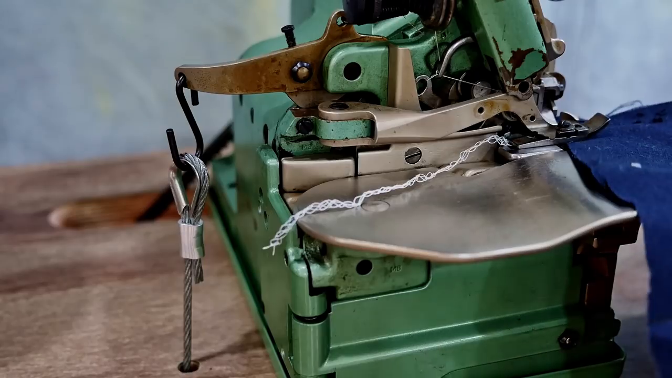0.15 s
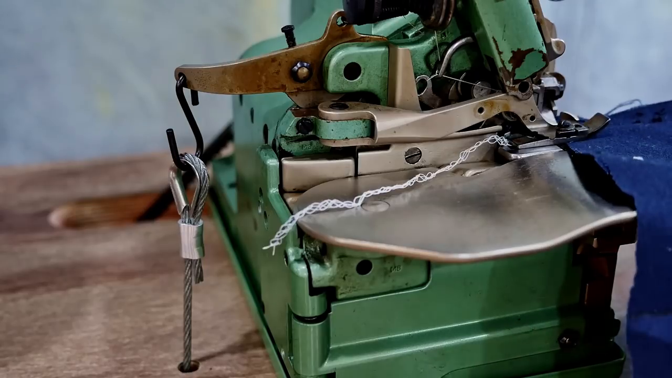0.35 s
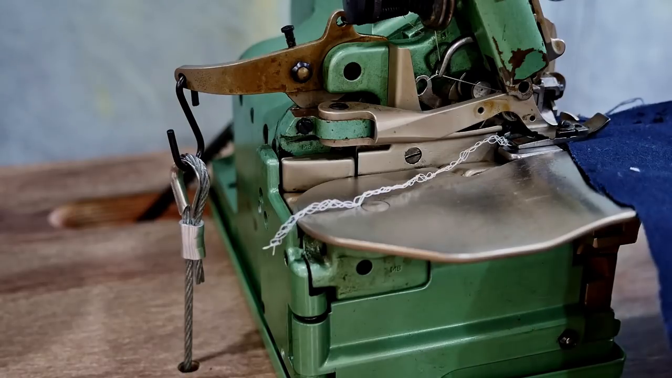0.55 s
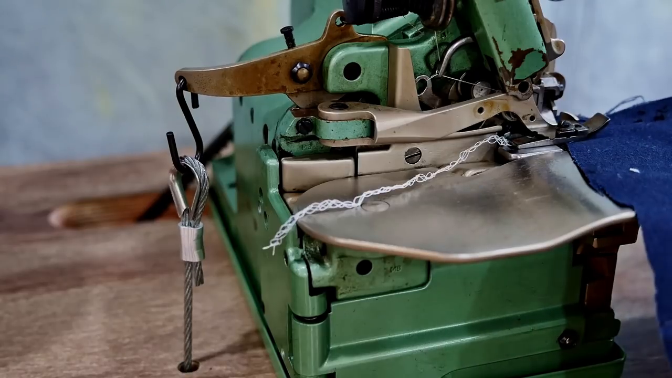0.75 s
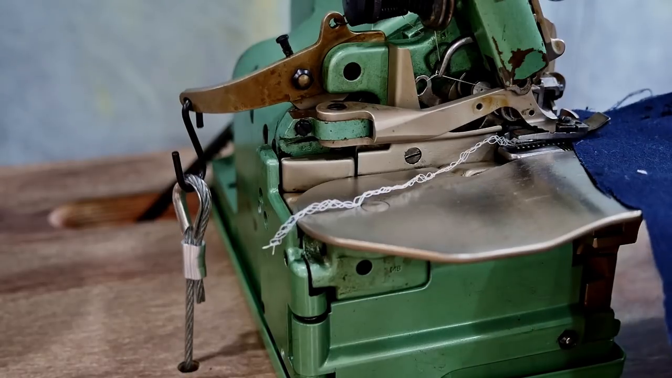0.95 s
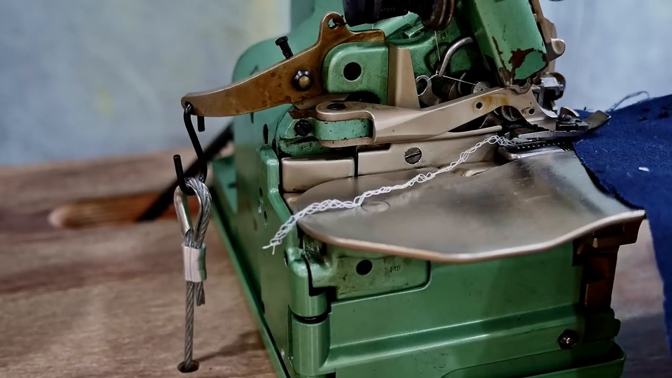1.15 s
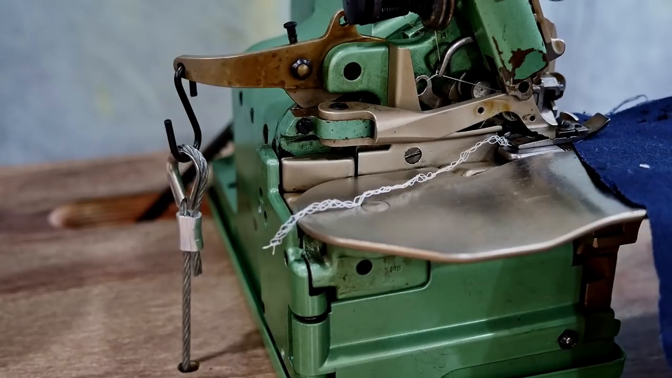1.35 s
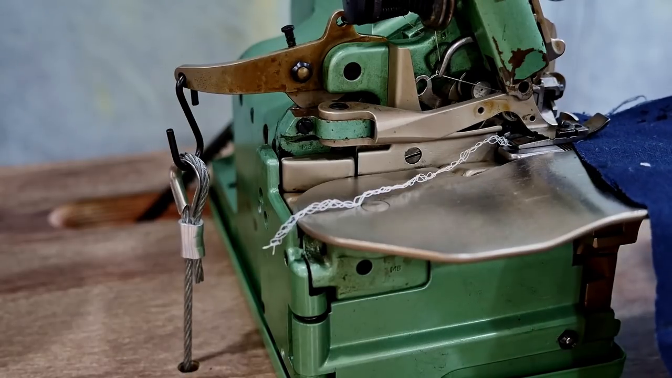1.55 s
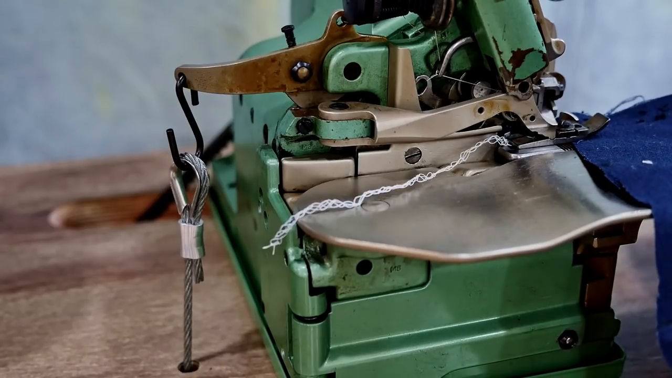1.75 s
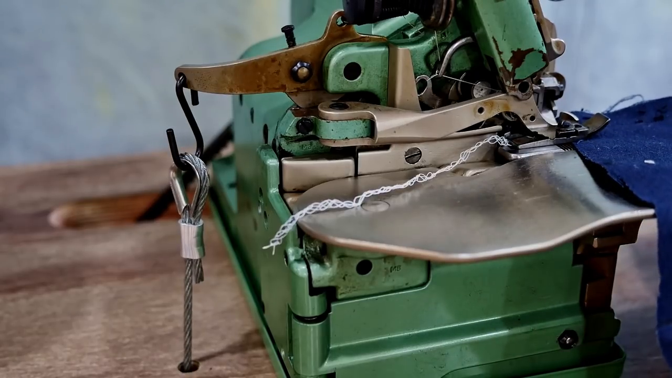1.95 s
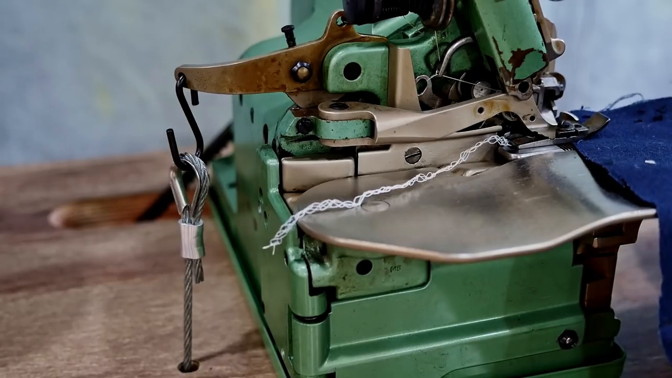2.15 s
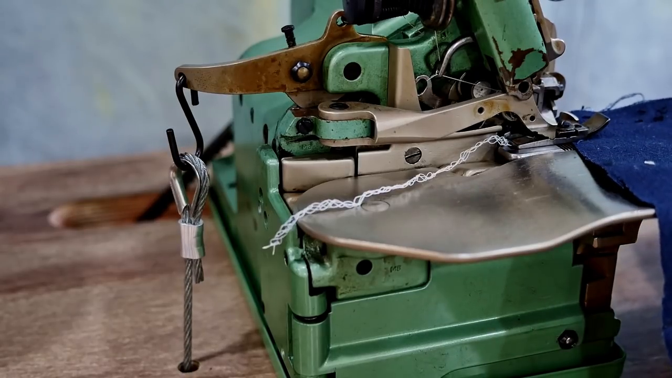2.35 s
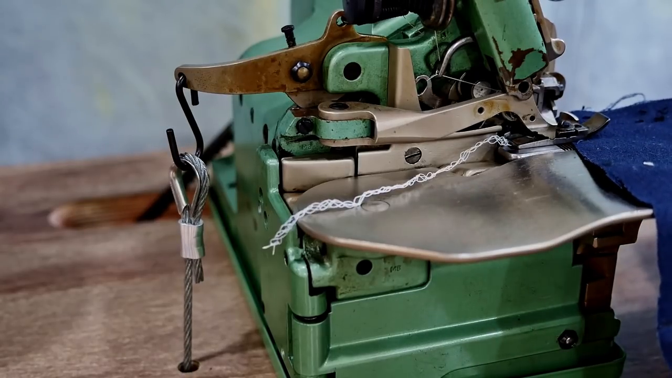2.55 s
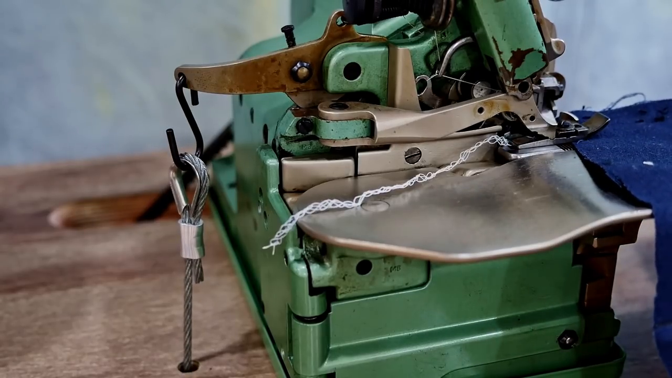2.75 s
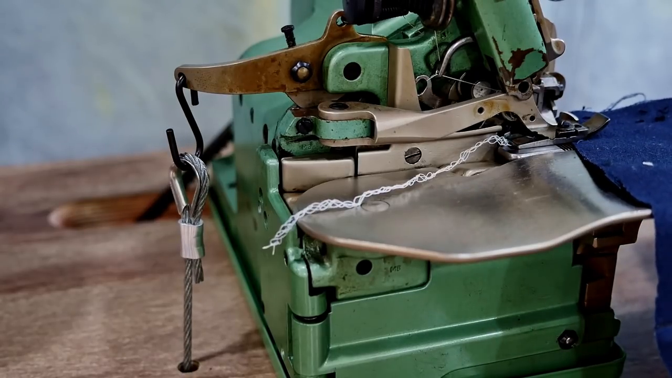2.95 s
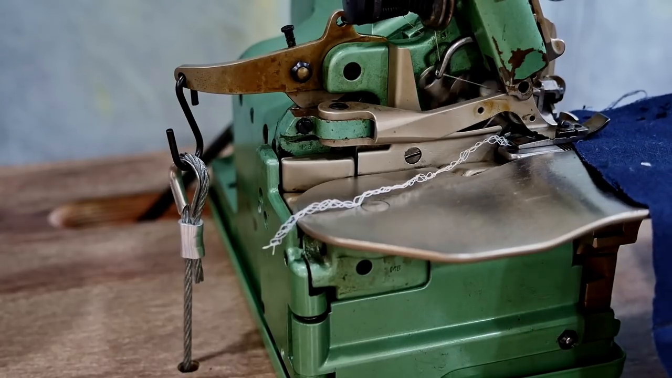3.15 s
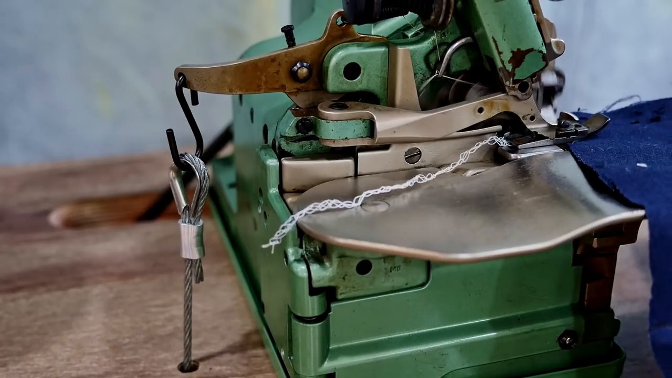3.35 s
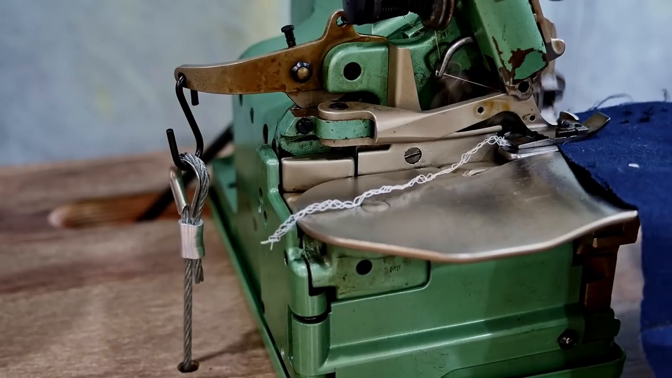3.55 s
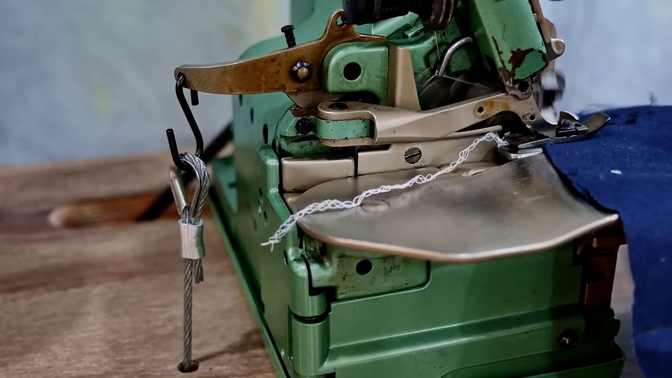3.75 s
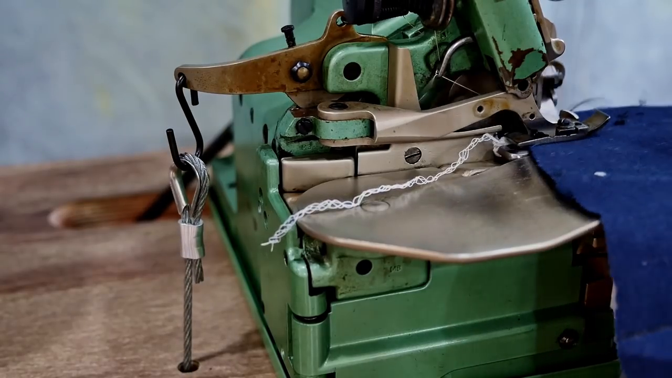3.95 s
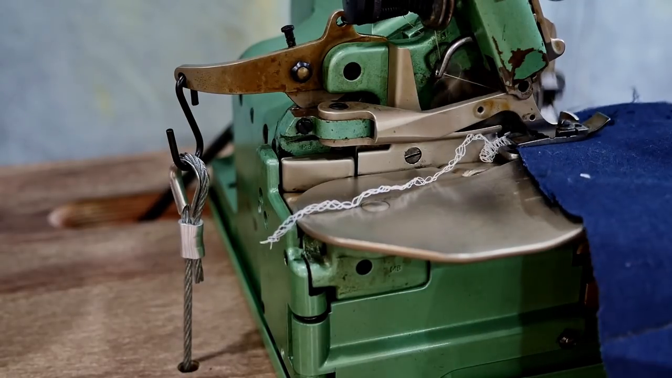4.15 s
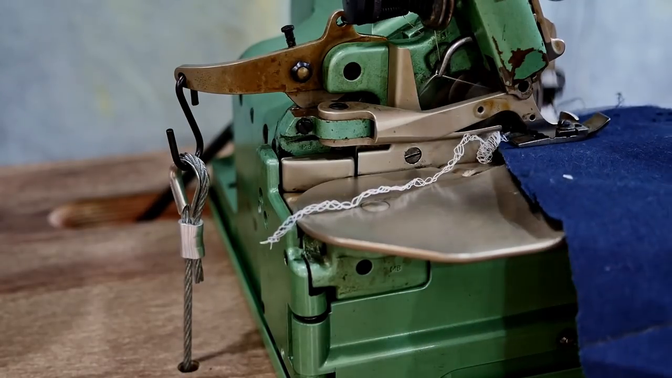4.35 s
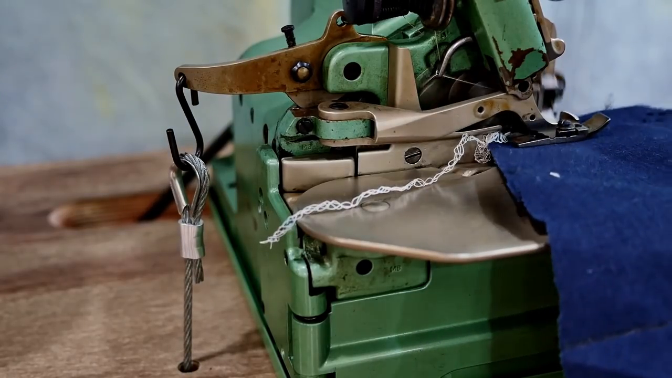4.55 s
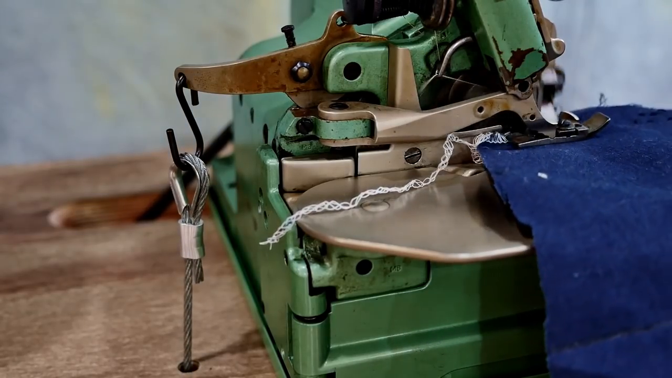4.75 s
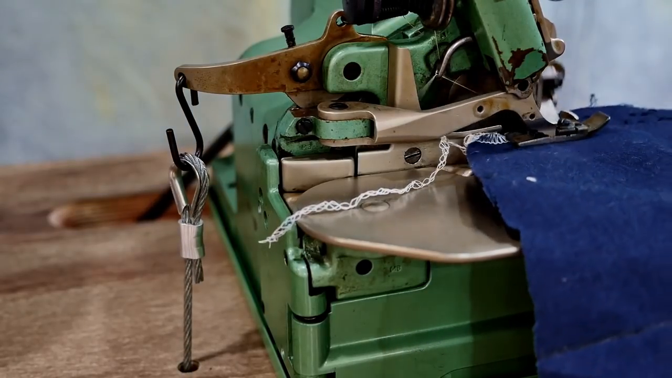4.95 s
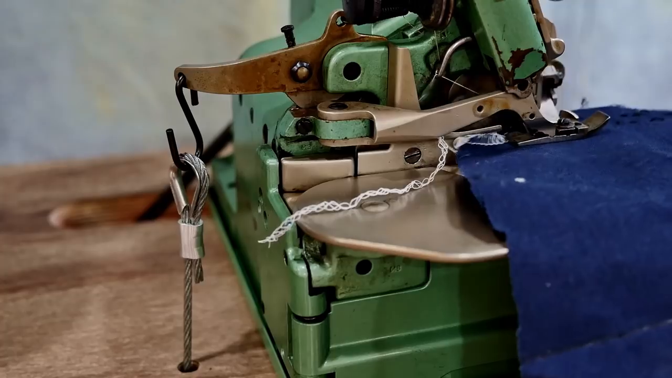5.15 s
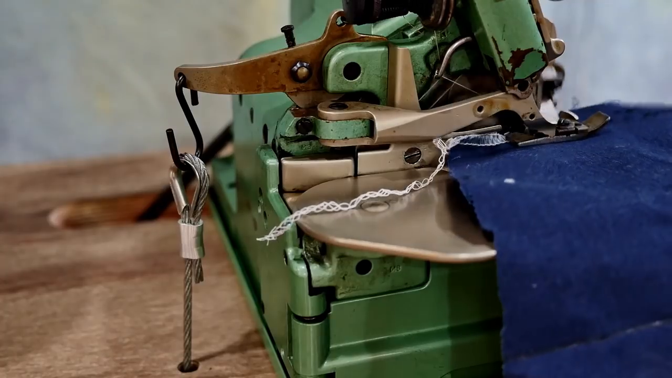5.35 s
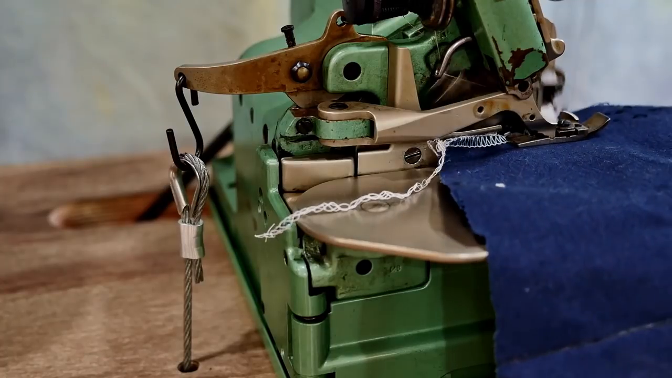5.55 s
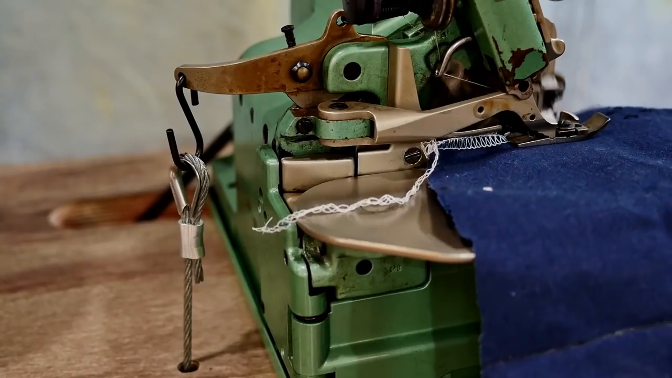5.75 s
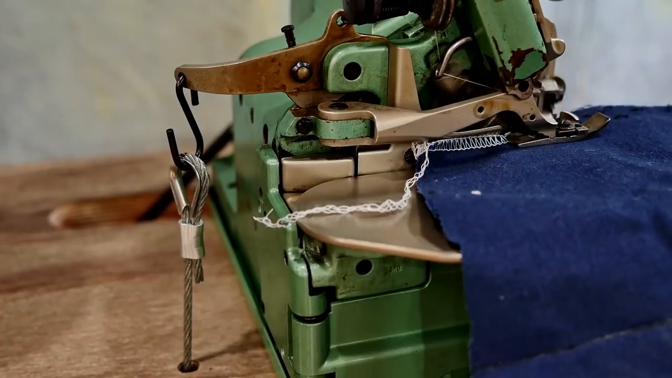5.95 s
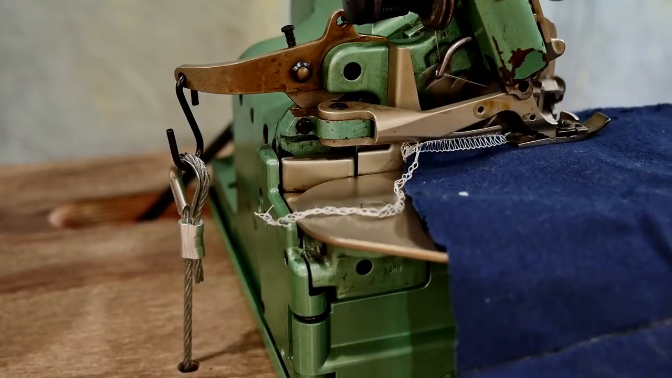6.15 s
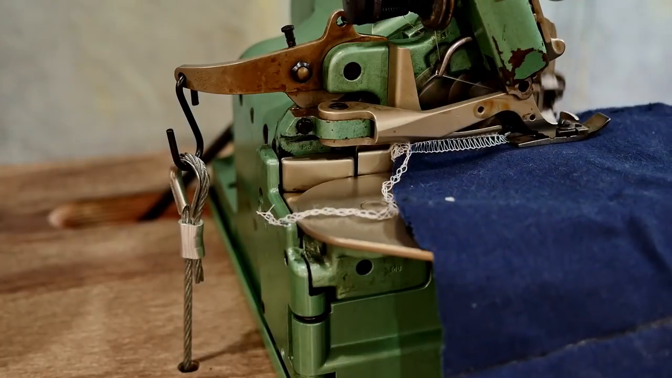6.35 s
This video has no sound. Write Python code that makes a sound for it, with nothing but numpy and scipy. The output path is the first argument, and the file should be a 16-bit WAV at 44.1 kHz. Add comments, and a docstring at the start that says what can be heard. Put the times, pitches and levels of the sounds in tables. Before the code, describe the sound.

A quiet workshop, heard through a close stereo microphone with little bass. From 0 s a faint low motor hum and soft airy noise continue under light brushing of cloth. Small dull knocks on a wooden table come around 0.6-0.7 s, then a cluster at 1.05-1.35 s with a sharp dry crack at 1.3 s. A lull follows, broken by a single harder, ringing table thump at 2.2 s and a barely audible rustle at 2.9 s. At 3.16 s the clutch snaps; the machine spins up within about 0.4 s into loud, dense metallic chatter, roughly thirteen strokes a second, with ringing steel blows, crisp ticks, grinding rattle, a fuzzy midrange drone and bright fizz. From 4.3 to 4.6 s it slows to about nine and a half strokes a second, slightly softer, and holds steadily, with occasional louder ticks, until it cuts off running at 6.4 s.

```python
"""Overlock sewing machine in a workshop.

The motor idles with a hum of shaft orders while hands brush cloth (swelling noise) and knock the wooden table
(ringing modes). The clutch snaps, the machine runs up fast, then settles to a slower stitch.
A shaft angle paces it: each turn under load gives one ringing blow of steel partials, every turn gives small
noise-burst ticks, and bands of noise (rattle, grind, drone, fizz) swell with the angle.
"""
import sys
import numpy as np
from scipy import signal
from scipy.fft import rfft, irfft, next_fast_len
from scipy.io import wavfile
from scipy.ndimage import uniform_filter1d, map_coordinates

SR = 44100
rng = np.random.default_rng(int(sys.argv[2]) if len(sys.argv) > 2 else 0)


def convert_level_to_amplitude(level_db):
    """Map a level in decibels to its linear amplitude factor."""
    exponent = np.asarray(level_db, float) / 20
    return 10 ** exponent


def dump(signal):
    """Clip the signal to [-1, 1] and save it as 16-bit WAV at the path in sys.argv[1]."""
    limited = np.clip(np.atleast_2d(signal).T, -1, 1)
    pcm = np.round(limited * 32767).astype(np.int16)
    wavfile.write(sys.argv[1], SR, pcm)


N = 283122

CLUTCH_S, START_ANGLE_TURNS = 3.159, 0.2983  # the clutch engages with the shaft this far into a turn
FULL_SPEED_TURNS_PER_S = 13.4
# Speed of the shaft. Each row: time in seconds, speed in turns per s.
SPEED = [(3.3205, 5.4564), (3.5487, 13.4686), (4.3073, 13.3316), (4.5818, 9.4164), (6.42, 9.4819)]
# Left-right likeness of wide noise. Each row: frequency in Hz, correlation from 0 to 1.
LIKENESS = [(40, 0.11), (150, 0.81), (500, 0.71), (2000, 0.86), (6000, 0.83), (12000, 0.57)]


def unit(x):
    """Scaled to rms 1."""
    return x / np.sqrt(np.mean(x ** 2) + 1e-20)


def along(points, hz):
    """(Hz, value) points read on a log frequency axis."""
    f, v = np.transpose(points)
    return np.interp(np.log(hz + 1), np.log(f + 1), v)


def wobble(rate_hz):
    """A smooth random curve, rate_hz knots a second."""
    knots = rng.standard_normal(int(N * rate_hz / SR) + 4)
    return map_coordinates(knots, [np.arange(N) * rate_hz / SR])


def filtered(x, response):
    """x times a complex response of frequency."""
    m = next_fast_len(N + SR // 2)
    return irfft(rfft(x, m) * response(np.fft.rfftfreq(m, 1 / SR)), m)[..., :N]


def resonances(peaks, f):
    """Causal sum of (Hz, width in Hz, dB) resonances of alternating sign."""
    return sum((-1) ** k * convert_level_to_amplitude(db) * 1j * f * w / (c * c - f * f + 1j * f * w)
               for k, (c, w, db) in enumerate(peaks))


def stereo_noise(spectrum, likeness, spiky_db, patchy_db):
    """Stereo noise of rms 1, in grains of unequal size and patches some 700 Hz by 12 ms."""
    grains = rng.standard_normal((2, N)) * convert_level_to_amplitude(spiky_db * unit(wobble(600)))
    z = signal.stft(grains, nperseg=256)[2]
    patches = uniform_filter1d(rng.standard_normal(z.shape[1:]), size=4, axis=0)
    patches = uniform_filter1d(patches, size=4, axis=1)
    noise = signal.istft(z * convert_level_to_amplitude(patchy_db * unit(patches)), nperseg=256)[1][:, :N]

    def mid_side(hz):
        turn = np.arccos(np.clip(along(likeness, hz), -1, 1)) / 2
        return spectrum(hz) * [np.cos(turn), np.sin(turn)]

    mid, side = filtered(noise, mid_side)
    return unit(np.array([mid + side, mid - side]))


def add(track, s, sound):
    """Mixes a sound in at s seconds."""
    start = round(s * SR)
    track[start:start + len(sound)] += sound[:N - start]


def shaft():
    """Angle in turns, speed in turns per s and in dB re full speed, effort (grip of the clutch) in dB."""
    # Each row: time in seconds, effort in dB.
    effort = [(3.159, -41), (3.21, -15.5), (3.37, -11), (3.42, -4.5), (3.471, 3), (3.56, 1), (3.8, -0.5),
              (4.1, 0.5), (6.42, 0.5)]
    t = np.arange(N) / SR
    speed = np.interp(t, *np.transpose(SPEED)) * (t >= CLUTCH_S)
    angle = START_ANGLE_TURNS + np.cumsum(speed) / SR
    speed_db = 20 * np.log10(speed / FULL_SPEED_TURNS_PER_S + 1e-3)
    effort_db = np.interp(t, *np.transpose(effort), left=-120, right=-120)
    return angle, speed, speed_db, effort_db


def each_turn(share):
    """Samples at which the shaft passes this share of a turn."""
    angle = shaft()[0]
    passes = np.arange(int(angle[-1]) + 1) + share
    return np.searchsorted(angle, passes[(passes > START_ANGLE_TURNS) & (passes < angle[-1])])


def moan():
    """A fuzzy tone of rms 1: a carrier of random strength and phase, rising with speed lost to cloth drag."""
    lost = (FULL_SPEED_TURNS_PER_S - shaft()[1]) * (np.arange(N) / SR > SPEED[1][0])
    hz = 795 + 12 * lost
    phase = 2 * np.pi * np.cumsum(hz) / SR
    return unit(wobble(70) * np.cos(phase) + wobble(70) * np.sin(phase))


def running():
    """Rattle and grind of the mechanism, drone of the table, fizz of thread and knife: noise loaded by angle."""
    # Rows: rattle, grind, drone, fizz. Each row: relative level at full speed in dB, dB per dB of effort,
    # dB per dB of speed, rise time constant after the clutch in seconds.
    layers = [(-34.5, 1.35, 0.22, .01), (-40.5, 0.83, 0.2, 0.018), (-45.5, 0.3, 0.97, 0.14),
              (-42.5, 0.5, 1.28, 0.24)]
    # Same rows, through one turn. Each row: dip while unloaded in dB, its middle and width in turns,
    # ripple of the three looper and feed strokes a turn in dB.
    loads = [(-5.5, 0.58, 0.11, 0.2), (-3, 0.65, 0.2, 1.2), (-1.5, 0.95, 0.24, 0.2),
             (-2.5, 0.65, 0.21, 1.95)]
    # Resonances of the cast frame. Each row: frequency in Hz, width in Hz, relative level in dB.
    casting = [(352.5, 27, -1), (518.5, 11, 0), (625, 43, -1), (1250, 64, 0.5), (1412, 30, -1.5),
               (1567, 53, -1.5), (1974, 58, -1.5), (2326, 160, -3), (2636, 54, -6.5), (2900, 23, -18),
               (2960, 22, 0.5), (3224, 35, 0), (4100, 40, -14)]
    # Noise spectra. Each row: frequency in Hz, relative density in dB per Hz.
    rattle_spectrum = [(1060, -31), (1800, -7.5), (2120, -6.5), (2560, 0.5), (2770, -0.5), (4430, -7),
                       (4790, -11), (6200, -19), (8060, -38), (13600, -120)]
    grind_spectrum = [(620, -35), (1050, -13.5), (1240, -16.5), (1380, 3), (1680, -5.5), (1800, 1),
                      (2340, -3.5), (3960, -120)]
    drone_spectrum = [(15, -64), (25, -7), (102, -5.5), (201, -18.5), (346, -4.5), (447, -5), (525, -3.5),
                      (700, -8.5), (821, 3), (996, -12.5), (1150, -7.5), (1500, -36), (2530, -120)]
    fizz_spectrum = [(3060, -26), (5200, 3), (5610, -0.5), (6060, -12), (6960, -8), (7880, -8.5),
                     (10000, -4.5), (10600, -14.5), (11500, -18.5), (14000, -11), (15700, -49),
                     (16300, -68)]
    angle, _, speed_db, effort_db = shaft()
    since_s = np.maximum(np.arange(N) / SR - CLUTCH_S, 0)

    def level_db(layer, load):
        db, by_effort, by_speed, rise_s = layer
        dip_db, middle, width, ripple_db = load
        rise_db = 20 * np.log10(1e-6 + 1 - np.exp(-since_s / rise_s))
        from_middle = (angle - middle + 0.5) % 1 - 0.5
        dip = dip_db * np.exp(-0.5 * (from_middle / width) ** 2)
        load_db = 0.9 + dip + ripple_db * np.cos(2 * np.pi * angle * 3)
        return db + by_effort * effort_db + by_speed * speed_db + rise_db + load_db

    def framed(spectrum):
        return lambda hz: convert_level_to_amplitude(along(spectrum, hz)) * (1 + 1.65 * abs(resonances(casting, hz)) ** 2)

    rattle_db, grind_db, drone_db, fizz_db = (level_db(*both) for both in zip(layers, loads))
    rattle = stereo_noise(framed(rattle_spectrum), LIKENESS, spiky_db=0.0, patchy_db=2.0)
    rattle = convert_level_to_amplitude(rattle_db + 0.15 * wobble(40)) * rattle
    grind = stereo_noise(framed(grind_spectrum), LIKENESS, spiky_db=1.2, patchy_db=0.5)
    grind = convert_level_to_amplitude(grind_db + 0.9 * wobble(40)) * grind
    drone = stereo_noise(framed(drone_spectrum), LIKENESS, spiky_db=0.5, patchy_db=1.0)
    drone = convert_level_to_amplitude(drone_db + 1.55 * wobble(30)) * (drone + convert_level_to_amplitude(-7.5 + 0.5 * effort_db) * moan())
    fizz = stereo_noise(lambda hz: convert_level_to_amplitude(along(fizz_spectrum, hz)), LIKENESS, spiky_db=1.0, patchy_db=2.5)
    fizz = convert_level_to_amplitude(fizz_db + 0.28 * wobble(70)) * fizz
    return rattle + grind + drone + fizz


def blows():
    """One blow a turn rings the decaying partials of the same steel part, a little differently each time."""
    # Each row: frequency in Hz, relative level in dB, t60 in seconds.
    bell = [(4725, 0.5, 0.049), (2524, -10, 0.19), (2960, -28, 0.024), (5300, -1, 0.0089),
            (6600, -8, 0.0081)]
    out, t = np.zeros(N), np.arange(SR // 8) / SR
    _, _, speed_db, effort_db = shaft()
    at = [i for i in each_turn(0) if effort_db[i] > -12]  # with less effort the part is only touched
    for i, (size, late, *scatter_db) in zip(at, rng.standard_normal((len(at), 2 + len(bell)))):
        db = -24.5 + 0.37 * min(effort_db[i], 0) + 0.61 * speed_db[i] - 0.8 * size
        ring = sum(convert_level_to_amplitude(level_db + r - 60 * t / t60) * np.sin(2 * np.pi * hz * t)
                   for (hz, level_db, t60), r in zip(bell, scatter_db))
        add(out, i / SR + 0.0004 + 0.0003 * late, convert_level_to_amplitude(db) * ring)
    return out


def ticks():
    """Bursts of about 2 ms into the broad modes of small steel parts, partly different in each ear."""
    # Contacts of loopers, knife and feed on every turn. Each row: share of the turn, relative level at full
    # speed in dB, dB per dB of speed, scatter in dB, duller part in dB re the level.
    contacts = [(0, -20.5, 2.5, -2, -10), (.322, -36, 2, -1, -8.5), (.69, -36.5, 10, 0.5, -7),
                (.85, -52, 4.5, -3, -2)]
    # Single ticks: start-up slaps, and contacts on some turns that are louder than usual.
    # Each row: start in seconds, relative level in dB, duller part in dB re the level.
    single_ticks = [(3.1859, -51, -18), (3.2876, -42, -15), (3.336, -39, -14), (3.363, -50, -4),
                    (3.4795, -30, -30), (3.558, -29, -5), (3.632, -24.5, -5.5), (3.7074, -25, -17),
                    (3.7975, -33, -9), (4.1447, -24, -19), (4.6052, -24.5, -12.5), (5.2421, -23.5, -5.5),
                    (5.965, -31, -14), (6.4045, -27, -9)]
    # Modes of small parts, bright pair then dull pair. Each row: frequency in Hz, width in Hz,
    # relative level in dB.
    small_parts = [(9700, 630, 2.5), (13000, 1500, -30), (6930, 1640, 5.5), (4650, 93, 14)]
    bright, dull = np.zeros((2, N)), np.zeros((2, N))
    t = np.arange(SR // 100) / SR
    _, _, speed_db, effort_db = shaft()
    hits = list(single_ticks)
    for share, db, by_speed, scatter_db, dull_db in contacts:
        at = each_turn(share)
        level_db = db + by_speed * speed_db[at] + 0.4 * np.minimum(effort_db[at], 0)
        level_db = level_db + scatter_db * rng.standard_normal(len(at))
        hits += [(i / SR, one_db, dull_db) for i, one_db in zip(at, level_db)]
    envelope = (1 - np.exp(-t / 0.00017)) * np.exp(-t / 0.00094) * 0.6
    for (s, db, dull_db), noise in zip(hits, rng.standard_normal((len(hits), 2, len(t)))):
        for ear, sign in enumerate((1, -1)):
            burst = (noise[0] + sign * 0.34 * noise[1]) * envelope
            add(bright[ear], s, convert_level_to_amplitude(db + 13) * burst)
            add(dull[ear], s, convert_level_to_amplitude(db + dull_db + 15) * burst)
    bright = filtered(bright, lambda f: resonances(small_parts[:2], f))
    return bright + filtered(dull, lambda f: resonances(small_parts[2:], f))


def knocks():
    """Blows ring the table top, hard ones up to its upper modes, and shake what lies on it."""
    # Each row: start in seconds, relative level in dB, modes over 800 Hz in dB, bright shake in dB.
    hits = [(0.632, -40, -23, -16), (0.689, -45.5, -16, -21), (0.722, -42, -5, -13.5),
            (1.053, -44, -10, -18), (1.095, -43.5, -11, -15), (1.135, -44.5, -20, -35),
            (1.189, -43, -17, -16.5), (1.208, -44, -20, -12), (1.31, -35.5, -23, -18.5),
            (1.326, -31, -19, -19.5), (2.181, -22, -2.5, -10)]
    # Modes of the table top. Each row: frequency in Hz, relative level in dB, t60 in seconds.
    modes = [(289, 4, 0.13), (334.7, -1, 0.17), (418.3, -6, 0.25), (526.5, 0, 0.083), (155, -8, 0.079),
             (980, -18, 0.07), (1233, -1, 0.22), (1360, -15, 0.44), (1684, -14, 0.12), (2080, -36, 0.1),
             (2460, -14, 0.19), (3010, -39, 0.076), (3530, -21, 0.053)]
    # Loose things, two low then three bright. Each row: frequency in Hz, width in Hz, relative level in dB.
    loose = [(148, 190, 1), (555, 185, 4), (1200, 186, 1), (1635, 170, -0.5), (2380, 910, -7.5)]
    out, low_shake, bright_shake = np.zeros((3, N))
    t = np.arange(SR // 2) / SR
    onset = 1 - np.exp(-t / 0.0029)
    for s, db, upper_db, shake_db in hits:
        ring = np.zeros(len(t))
        for hz, level_db, t60 in modes:
            scatter, detune = rng.standard_normal(2)
            decay = convert_level_to_amplitude(level_db + upper_db * (hz > 800) + 1.65 * scatter - 60 * t / t60)
            beat = 1 + 0.45 * np.cos(2 * np.pi * 0.054 * hz * detune * t)  # weaker neighbours of the mode
            ring += decay * np.sin(2 * np.pi * hz * t) * beat
        noise = rng.standard_normal(len(t)) * onset
        add(out, s, convert_level_to_amplitude(db - 6.5) * ring * onset)
        add(low_shake, s, convert_level_to_amplitude(db + 4.5 - 60 * t / 0.16) * noise)
        add(bright_shake, s, convert_level_to_amplitude(db + shake_db + 17 - 60 * t / 0.25) * noise)

    def band(f):  # loose things neither boom nor hiss
        return (1j * f / (110 + 1j * f)) ** 2 * (2700 / (2700 + 1j * f)) ** 2

    out = filtered(out, lambda f: (1j * f / (70 + 1j * f)) ** 2)
    low_shake = filtered(low_shake, lambda f: band(f) * resonances(loose[:2], f))
    return out + low_shake + filtered(bright_shake, lambda f: band(f) * resonances(loose[2:], f))


def snaps_and_rustle():
    """Two dry cracks and a faint rustle, mostly wake: fast- and slow-fading noise in body and treble bands."""
    # Two dry cracks, and at 2.922 s the rustle; the last is the clutch.
    # Each row: start in seconds, relative level in dB, treble in dB, wake in dB.
    bursts = [(1.296, -26.5, 5.5, -31), (2.922, -65.5, -1, 3), (3.159, -31.5, -17, -25)]
    body, treble = np.zeros((2, N))
    t = np.arange(SR // 5) / SR
    for s, db, treble_db, wake_db in bursts:
        envelope = (convert_level_to_amplitude(-60 * t / 0.008) + convert_level_to_amplitude(wake_db - 60 * t / 0.22)) * (1 - np.exp(-t / 0.0011))
        burst = rng.standard_normal(len(t)) * envelope
        add(body, s, convert_level_to_amplitude(db + 14.5) * burst)
        add(treble, s, convert_level_to_amplitude(db + treble_db + 4.5) * burst)
    body = filtered(body, lambda f: resonances([(2400, 2540, 0.0062)], f) ** 2)
    return body + filtered(treble, lambda f: resonances([(6200, 8800, 0)], f) ** 2)


def cloth():
    """Hands brush the cloth at first: noise whose level swells and fades linearly in dB."""
    # Each row: peak time in seconds, relative level in dB, swell in dB per s, fade in dB per s.
    strokes = [(0.0, -63, 100, 92), (0.218, -67, 54, 44), (0.674, -71, 55, 300), (0.898, -65, 800, 1500),
               (0.964, -70, 254, 150), (1.096, -65.5, 1498, 170)]
    # Each row: frequency in Hz, relative density in dB per Hz.
    rustle = [(600, -7), (1500, -4.5), (3000, -7.5), (5500, -6.5), (7000, -15), (9500, -9.5), (12000, -29),
              (16000, -12)]
    t = np.arange(N) / SR
    hands = sum(convert_level_to_amplitude(db - swell * np.maximum(s - t, 0) - fade * np.maximum(t - s, 0))
                for s, db, swell, fade in strokes)
    noise = stereo_noise(lambda hz: convert_level_to_amplitude(along(rustle, hz)), LIKENESS, spiky_db=0.3, patchy_db=0.0)
    return hands * convert_level_to_amplitude(0.65 * wobble(26.0)) * noise


def motor_hum():
    """The motor hums on multiples of its shaft rate, which drifts slightly; each order sways in level."""
    # Each row: multiple of the motor shaft rate, relative level in dB.
    orders = [(1, -108.5), (4, -69), (5, -62.5), (8, -89), (9, -79.5), (12, -84.5), (29, -83), (54, -84)]
    turns = np.cumsum(59.2 * (1 + 0.0003 * wobble(2))) / SR
    return sum(convert_level_to_amplitude(db + 2.5 + 1.2 * wobble(3.92)) * np.sin(2 * np.pi * (k * turns + rng.random()))
               for k, db in orders)


def workshop_air():
    """Wide, gently swaying noise of the workshop."""
    # Each row: frequency in Hz, relative density in dB per Hz.
    shop = [(15, -62), (25, -16), (76, -12), (249, -6.5), (293, -6), (373, -10.5), (714, -20), (818, -23),
            (1700, -21.5), (2760, -29), (3160, -32), (3430, -29.5), (9070, -37.5), (14800, -35.5),
            (16000, -57)]
    wide = [(40, 0.089), (250, 0.28), (1000, 0.092), (8000, 0.4)]  # Hz, left-right likeness
    noise = stereo_noise(lambda hz: convert_level_to_amplitude(along(shop, hz)), wide, spiky_db=0.2, patchy_db=0.2)
    return convert_level_to_amplitude(-59.5 + 0.8 * wobble(8)) * noise


def room(x):
    """The walls answer after 250 samples with noise in which each frequency dies at its own speed."""
    # Each row: frequency in Hz, t60 in seconds.
    walls = [(200, 0.34), (2000, 0.57), (10000, 0.2)]
    hz, t, z = signal.stft(rng.standard_normal((2, SR // 2)), SR, nperseg=256)
    decay = convert_level_to_amplitude(-60 * t / along(walls, hz)[:, None])
    tail = signal.istft(z * decay, SR, nperseg=256)[1]
    late = np.pad(x, (250, 0))[None]
    return signal.fftconvolve(late, tail / np.linalg.norm(tail[0]), axes=1)[:, :N]


def scene():
    """The machine stands a little to the right, the table hits to the left; walls answer the hits."""
    # A reflection off the cloth plate cancels part of the machine's treble.
    # Each row: frequency in Hz, gain in dB.
    plate = [(7200, 0), (7900, -6.5), (8500, 0.5)]
    machine = filtered(running() + blows() + ticks(), lambda hz: convert_level_to_amplitude(along(plate, hz)))
    machine = machine * convert_level_to_amplitude([[-0.5], [0.5]])
    table = knocks() + snaps_and_rustle()
    background = (motor_hum() + workshop_air() + cloth()) * convert_level_to_amplitude([[0.9], [-0.9]])
    return machine + table * convert_level_to_amplitude([[0.4], [-0.4]]) + convert_level_to_amplitude(-9.5) * room(table) + background


def top_cut(x):
    """Nothing passes above the cut-off."""
    return signal.sosfilt(signal.butter(12, 16480, fs=SR, output="sos"), x)


def record(dry):
    """A small microphone with little bass and a weak top treble."""
    # Each row: frequency in Hz, gain in dB.
    mic = [(20, -12), (60, -14.5), (120, 1.5), (10800, 0.5), (12000, -10), (15500, -12), (16500, -41.5)]
    mix = filtered(dry, lambda hz: convert_level_to_amplitude(along(mic, hz)))
    return top_cut(mix)


dry = scene()
out = record(dry)
dump(out)
```